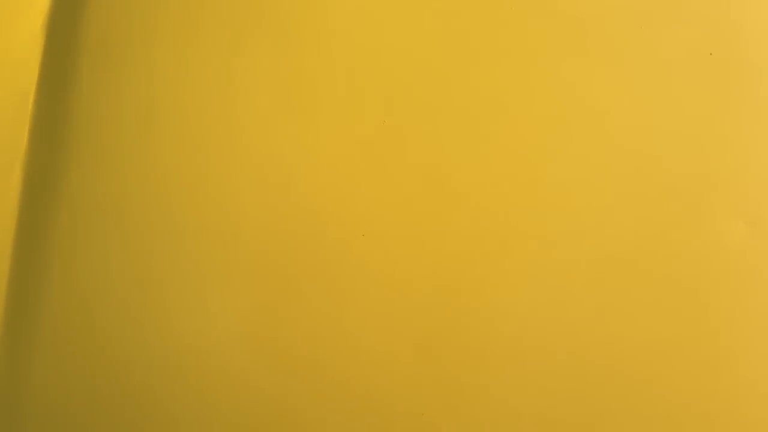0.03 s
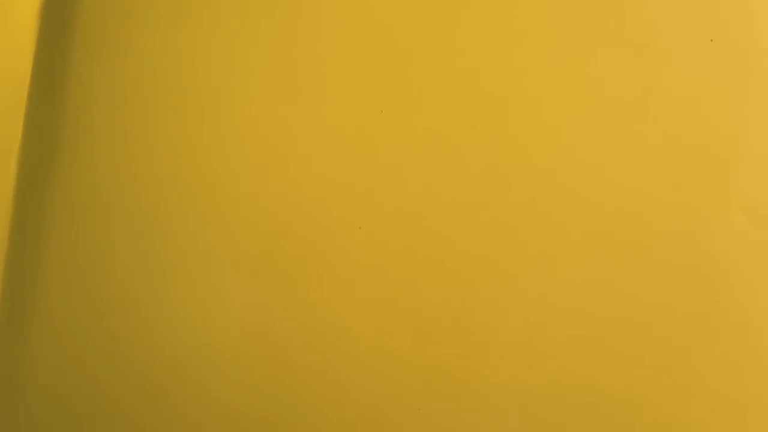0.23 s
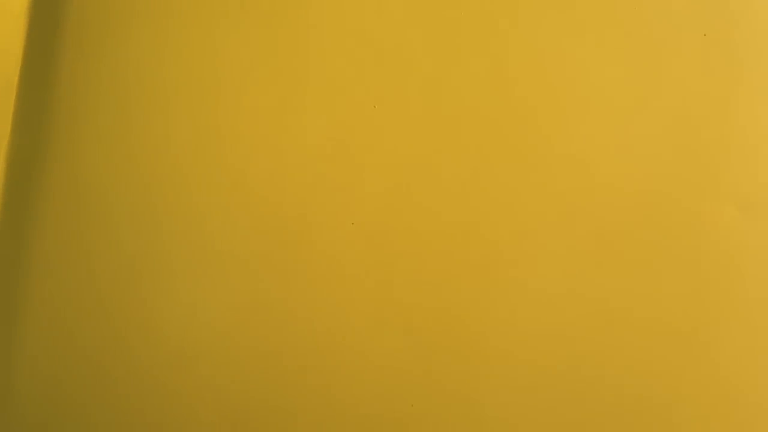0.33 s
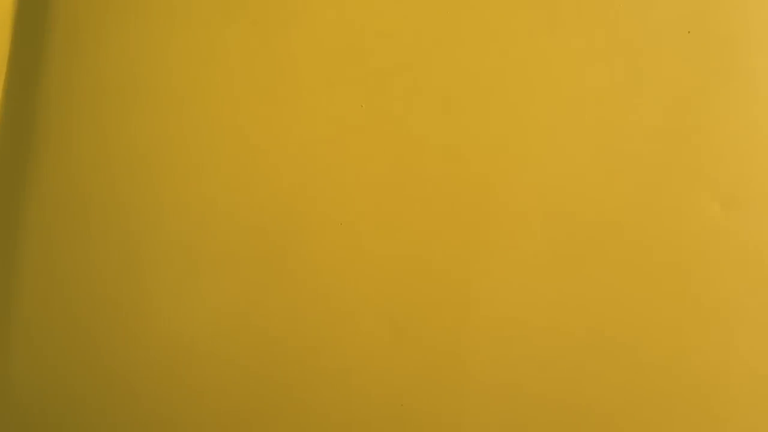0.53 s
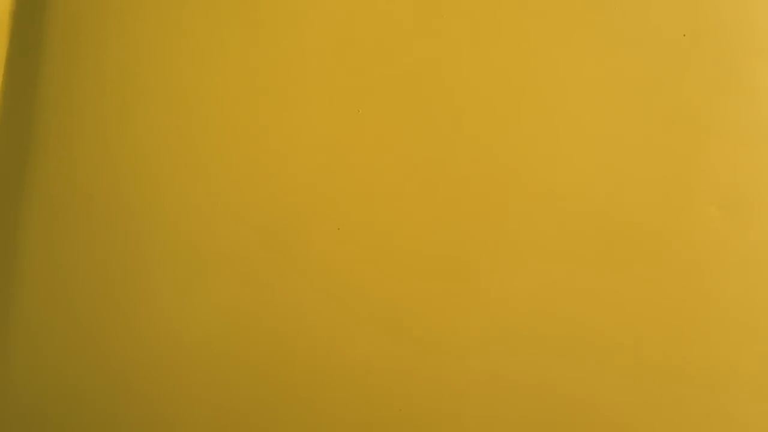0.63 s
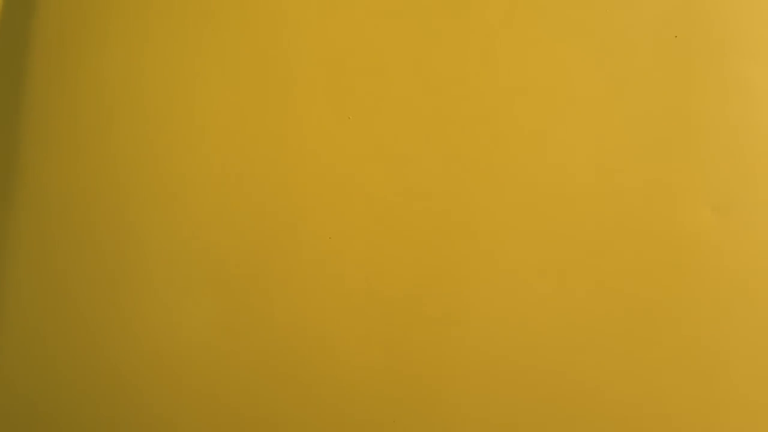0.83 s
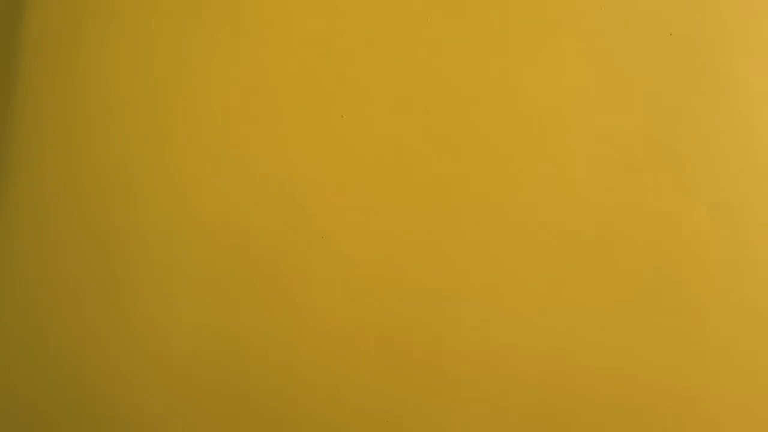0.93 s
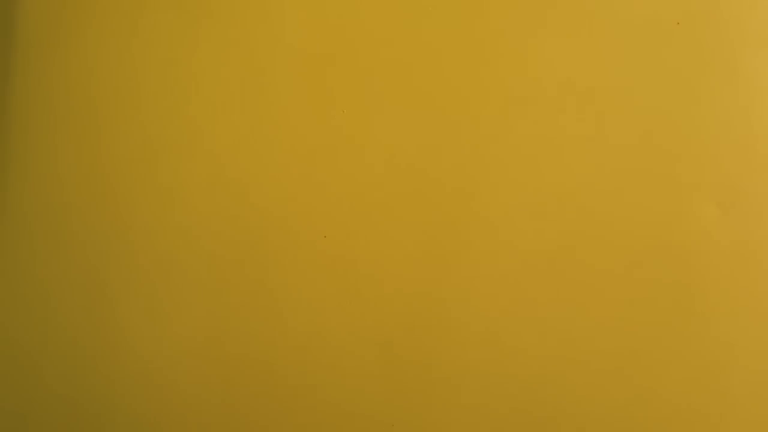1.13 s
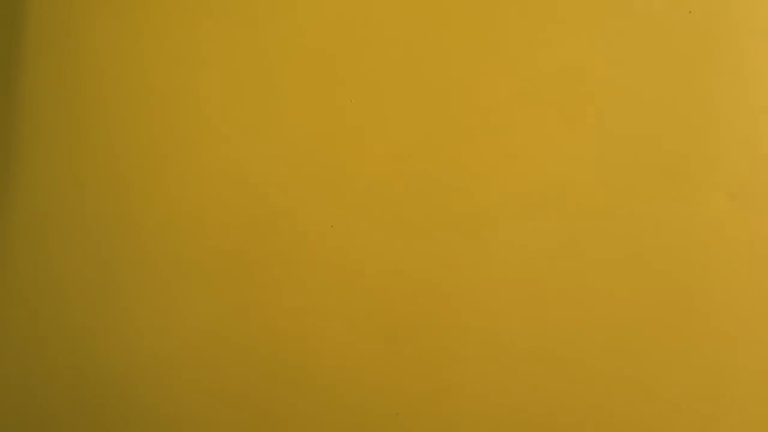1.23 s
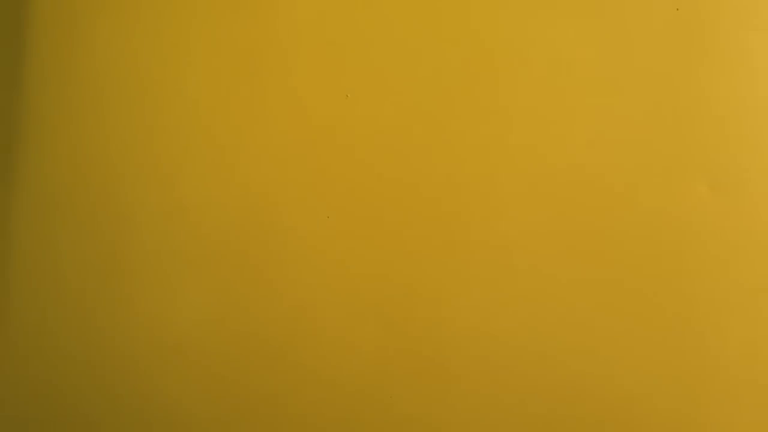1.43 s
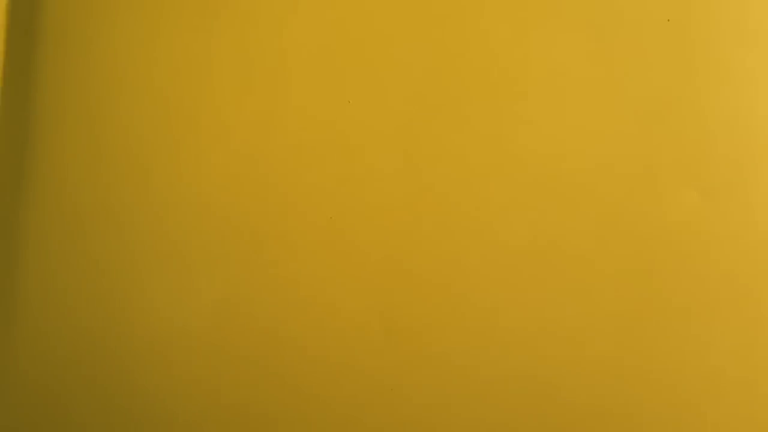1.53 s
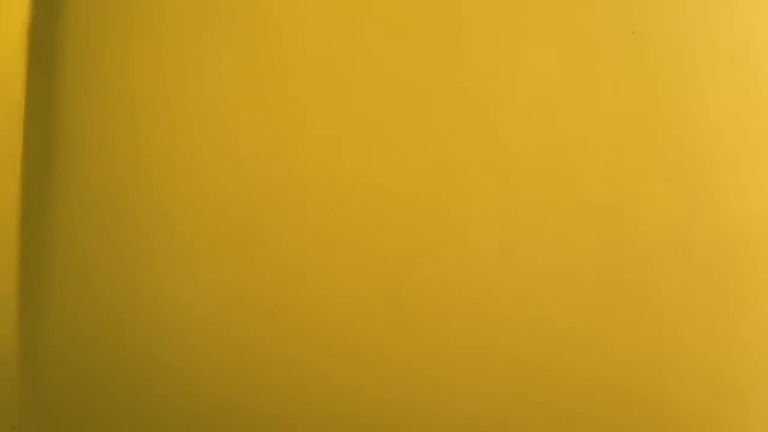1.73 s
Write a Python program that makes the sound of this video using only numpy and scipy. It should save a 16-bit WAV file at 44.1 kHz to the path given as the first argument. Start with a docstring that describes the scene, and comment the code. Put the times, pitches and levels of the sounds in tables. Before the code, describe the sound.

A lock, possibly in a car door, clunks twice about a second apart, close to the microphone. Each clunk mixes a panel thud with steel clicks, then softer knocks and faint spring ringing over quiet room noise.

```python
"""Close by a lock, perhaps in a car door. The lock is worked twice: each time the bolt slides briefly,
slams home in a quick cluster of contacts and knocks again more softly as it settles.
The panel thuds, the housing clacks, steel parts click and springs ring on over a faint room murmur."""
import sys
import numpy as np
from scipy import signal
from scipy.fft import rfft, irfft, next_fast_len
from scipy.io import wavfile

SR = 44100
rng = np.random.default_rng(int(sys.argv[2]) if len(sys.argv) > 2 else 0)


def unload_wav(signal):
    """Save mono or channel-first audio to the path in sys.argv[1] as 16-bit WAV at rate SR, clipped to [-1, 1]."""
    wavfile.write(
        sys.argv[1],
        SR,
        np.round(np.clip(np.atleast_2d(signal).T, -1, 1) * 32767).astype(np.int16),
    )


N = 79380
CLUNKS_S = [0.23, 1.154]
PANEL_ATTACK_S, STEEL_ATTACK_S = 0.00071, 0.0001


def amp(db):
    """Decibels to gain."""
    return 10 ** (np.asarray(db) / 20)


def unit(x):
    """Scale to rms 1."""
    return x / np.sqrt(np.mean(x ** 2) + 1e-20)


def along(points, hz):
    """Interpolate (f/Hz, value) points on a log axis."""
    f, value = np.transpose(points)
    return np.interp(np.log(hz + 1), np.log(f + 1), value)


def noise(spectrum, size):
    """Coloured noise of rms 1."""
    gain = amp(along(spectrum, np.fft.rfftfreq(size, 1 / SR)))
    return unit(irfft(rfft(rng.standard_normal(size)) * gain, size))


def fade(t, attack_s, t60_s):
    """Quick rise, exponential decay."""
    return (1 - np.exp(-t / attack_s)) * amp(-60 * t / t60_s)


def ring(modes, stop, t, attack_s, scatter_db):
    """Damped modes, balanced by the bolt's end stop (0 or 1) and varied with each blow."""
    out = np.zeros(len(t))
    for hz, t60_s, *levels_db in modes:
        gain = amp(levels_db[stop] + scatter_db * rng.standard_normal())
        out += gain * fade(t, attack_s, t60_s) * np.sin(2 * np.pi * hz * t)
    return out


def dense_ring(spectrum, t, attack_s, t60_s):
    """Dense ringing that opens with a brief crack."""
    crack = amp(-4.5) * fade(t, attack_s, t60_s=0.012)
    return noise(spectrum, len(t)) * (fade(t, attack_s, t60_s) + crack)


def add(out, start_s, x):
    """Mix x in from start_s."""
    part = out[round(start_s * SR):][:len(x)]
    part += x[:len(part)]


# Bolt contacts: t/s, thud/dB, clack/dB, click/dB, snap/dB, struck part f/Hz
BOLT_CONTACTS = [(0.201, -26.5, -15.5, -14.5, -19.5, 4020), (0.2064, -33.5, -16.5, -17.5, -31, 3760),
                 (.2185, -24.5, -19, -16.5, -26, 3500), (.2240, -20.5, -32, -31.5, -48, 4300),
                 (0.2332, -24.5, -18.5, -40.5, -50, 3740), (0.3188, -31.5, -49.5, -41, -60, 4080),
                 (0.3274, -38.5, -43, -49, -70, 3400), (.3480, -40, -64, -57, -76, 4500),
                 (0.373, -66, -49.5, -62, -78, 5200), (1.1282, -19, -22.5, -22.5, -40, 5450),
                 (1.1345, -32.5, -20.5, -30.5, -49, 5230), (1.1460, -30, -61, -44, -62, 5600),
                 (1.1540, -33.5, -28, -20, -25.5, 4370), (1.1585, -30, -29.5, -27, -28.5, 4200),
                 (1.1745, -31, -30, -41, -46, 3920), (1.2467, -27.5, -30.5, -51.5, -70, 3500),
                 (1.2560, -38, -42, -52, -78, 3500), (1.2750, -34.5, -41.5, -74, -80, 3550),
                 (1.2950, -36, -43, -61.5, -83, 3090), (1.5275, -83, -66, -69.5, -79, 2414),
                 (1.5654, -81, -58.5, -63, -81, 2195)]
def bolt_contacts():
    """Each contact shakes panel, housing and steel parts; the hardest also snap audibly."""
    out, t = np.zeros(N), np.arange(SR // 2) / SR
    for start_s, thud_db, clack_db, click_db, snap_db, part_hz in BOLT_CONTACTS:
        stop = int(start_s > np.mean(CLUNKS_S))
        thud = amp(thud_db) * panel_thud(stop, t)
        clack = amp(clack_db) * housing_clack(stop, t)
        click = amp(click_db) * steel_click(stop, part_hz, t)
        add(out, start_s, thud + clack + click + amp(snap_db) * snap(t))
    return out


# Panel modes: f/Hz, t60/s, stop 0 level/dB, stop 1 level/dB
PANEL_MODES = [(132, 0.076, -26, -25.5), (182.3, .14, -5, -3.5), (224.6, .19, -10, -0.5),
               (331.6, .15, -7.5, -5), (360.4, 0.16, 1.5, -9), (404, 0.21, -5.5, -6),
               (434.4, 0.16, -9, -13), (519.7, 0.1, -0.5, -1.5), (583, 0.098, -11.5, -12),
               (826, .13, -11.5, -13.5), (870.3, .12, -7, -8)]
def panel_thud(stop, t):
    """The panel rings in its low modes."""
    return ring(PANEL_MODES, stop, t, PANEL_ATTACK_S, scatter_db=3.5)


# Dense housing ringing: f/Hz, stop 0 level/dB, stop 1 level/dB
HOUSING_SPECTRA = [(30, -36.5, -38), (92, -27, -21), (170, -6.5, -4), (448, -1.5, 0.5), (850, 0, -3),
                   (1240, -7.5, -4.5), (1550, -3, -12), (2300, -16.5, -14.5), (4080, -28.5, -18.5),
                   (16000, -59.5, -70)]
# Housing modes: f/Hz, t60/s, stop 0 level/dB, stop 1 level/dB
HOUSING_MODES = [(703, .08, -14, -11.5), (759, .09, -8.5, -11), (871, 0.055, -4, -3.5),
                 (1025, 0.074, 2.5, -7), (1168, .11, -14, -6.5), (1484, 0.17, -8.5, -16),
                 (1560, .09, -9, -36), (1829, .12, -13, -20)]
def housing_clack(stop, t):
    """The housing rings densely around a few midrange modes."""
    spectrum = [(hz, levels_db[stop]) for hz, *levels_db in HOUSING_SPECTRA]
    dense = dense_ring(spectrum, t, PANEL_ATTACK_S, t60_s=0.095)
    modes = ring(HOUSING_MODES, stop, t, PANEL_ATTACK_S, scatter_db=0.5)
    return amp(-1) * dense + amp(-3) * modes


# Dense steel ringing: f/Hz, level/dB
STEEL_SPECTRUM = [(300, -19), (1200, -10), (2000, -5), (2500, -10.5), (3100, -3), (3700, -0.5),
                  (4700, -5.5), (5900, -8), (7000, -5.5), (8200, -23.5), (16000, -31)]
# Steel modes: f/Hz, t60/s, stop 0 level/dB, stop 1 level/dB
STEEL_MODES = [(3270, .07, -5, -12), (3620, .08, -1.5, -8), (3670, .08, -2, -16), (4035, 0.075, -6, -7),
               (4920, .05, -7.5, -12), (6750, .04, -8, -22)]
def steel_click(stop, part_hz, t):
    """The steel parts ring high and briefly."""
    dense = dense_ring(STEEL_SPECTRUM, t, STEEL_ATTACK_S, t60_s=0.066)
    ping = struck_part(part_hz, t)
    modes = ring(STEEL_MODES, stop, t, STEEL_ATTACK_S, scatter_db=1.5)
    return amp(-3.5) * dense + amp(-3) * ping + amp(-5) * modes


def struck_part(hz, t, width_hz=370):
    """Short, fuzzy ping of the steel part that takes the blow."""
    offset_hz = np.fft.rfftfreq(len(t), 1 / SR) - hz
    resonance = 1 / (1 + (2 * offset_hz / width_hz) ** 2)
    band = irfft(rfft(rng.standard_normal(len(t))) * resonance, len(t))
    return unit(band) * fade(t, STEEL_ATTACK_S, t60_s=0.042)


# Contact snap: f/Hz, level/dB
SNAP_SPECTRUM = [(500, -24.5), (3000, 7), (4500, -6.5), (7000, 3.5), (8400, 0), (11000, 4), (13000, -2.5),
                 (15500, -7.5)]
def snap(t):
    """Sharp, bright burst of a contact."""
    return noise(SNAP_SPECTRUM, len(t)) * fade(t, STEEL_ATTACK_S, t60_s=0.037)


# Bolt travel: start t/s, end t/s, final level/dB, rise/dB
BOLT_SLIDES = [(0.172, .203, -33, 14.5), (1.085, 1.114, -49, 2), (1.116, 1.130, -31.5, 14)]
# Bolt friction: f/Hz, level/dB
RUB_SPECTRUM = [(40, -42), (90, -24), (160, 11), (400, 2), (900, -9), (1600, -13.5), (3600, -17.5),
                (5000, -26.5), (7000, -31.5), (9000, -38.5), (16000, -43.5)]
def bolt_slides():
    """The bolt rubs along its guide before it lands."""
    out = np.zeros(N)
    for start_s, end_s, final_db, rise_db in BOLT_SLIDES:
        size = int((end_s - start_s) * SR)
        rub = noise(RUB_SPECTRUM, SR // 4)[:size]
        swell = amp(final_db + np.linspace(-rise_db, 0, size))
        add(out, start_s, rub * swell * signal.windows.tukey(size, 0.2))
    return out


# Spring modes: f/Hz, t60/s, beat/Hz, second direction/dB, stop 0 level/dB, stop 1 level/dB
SPRING_MODES = [(262, .85, 2, -2.5, -61, -35), (326.3, 0.9, 2.7, -12, -43.5, -70),
                (406, 3.4, 3.5, -8, -66, -55), (517, 0.83, 4, -3, -30, -74),
                (646.3, 1.9, 1.2, -22, -43, -55), (978, 2.1, 6.5, -13.5, -58, -64),
                (2458, 1.8, 2.4, -15.5, -61, -75), (3010, 1.5, 1.1, -10, -66, -65),
                (3420, .55, 4.9, -6.5, -55.5, -57)]
def springs(attack_s=0.029):
    """Springs swell after each clunk; their two bending directions beat slowly."""
    out, t = np.zeros(N), np.arange(N) / SR
    for hz, t60_s, beat_hz, twin_db, *levels_db in SPRING_MODES:
        pair = np.sin(2 * np.pi * hz * t) + amp(twin_db) * np.sin(2 * np.pi * (hz + beat_hz) * t)
        for start_s, db in zip(CLUNKS_S, levels_db):
            add(out, start_s, amp(db) * fade(t, attack_s, t60_s) * pair)
    return out


# Room decay: f/Hz, t60/s
ROOM_DECAY = [(150, 0.66), (500, 0.35), (1200, .36), (3200, .5), (5000, 0.23), (12000, 0.07)]
# Room colour: f/Hz, level/dB
ROOM_SPECTRUM = [(150, 5), (500, 2.5), (1000, -3), (2400, 0.5), (3500, -6), (4300, -13), (12000, -6.5)]
def room(x):
    """Short, dull diffuse tail; the treble dies first."""
    hz, t, bins = signal.stft(rng.standard_normal(SR), SR, nperseg=256)
    t60_s = along(ROOM_DECAY, hz)[:, None]
    level_db = along(ROOM_SPECTRUM, hz)[:, None] - 60 * t / t60_s
    tail = signal.istft(bins * amp(level_db), SR, nperseg=256)[1]
    return signal.fftconvolve(x, tail / np.linalg.norm(tail))[:N]


# Room murmur: f/Hz, level/dB
MURMUR_SPECTRUM = [(25, -15.5), (65, -20), (95, -12), (140, -2.5), (240, -1.5), (400, -6.5), (600, -12),
                   (900, -12), (1800, -23), (4000, -28), (8000, -39), (15500, -43)]
# Murmur drift: t/s, level/dB
MURMUR_DRIFT = [(0, -58), (.14, -55), (.5, -59), (.85, -63), (1.03, -63), (1.4, -60.5), (1.68, -59.5),
                (1.8, -64.5)]
def murmur():
    """Low room noise, slowly drifting in level."""
    level_db = np.interp(np.arange(N) / SR, *np.transpose(MURMUR_DRIFT))
    return amp(level_db) * noise(MURMUR_SPECTRUM, N)


def hiss():
    """Steady white microphone hiss."""
    return amp(-68) * rng.standard_normal(N)


def scene():
    """Lock, room and background in mono."""
    lock = bolt_contacts() + bolt_slides()
    return (lock + amp(-21) * room(lock) + springs() + murmur() + hiss())[None]


def record(dry, low_cut_hz=140, top_hz=15700):
    """Cut the deep bass and the highest treble, keeping the thuds tight."""
    thin = signal.sosfilt(signal.butter(2, low_cut_hz, "high", fs=SR, output="sos"), dry)
    size = next_fast_len(N + SR // 2)
    passband = np.fft.rfftfreq(size, 1 / SR) < top_hz
    return irfft(rfft(thin, size) * passband, size)[..., :N]


dry = scene()
out = record(dry)
unload_wav(out)
```